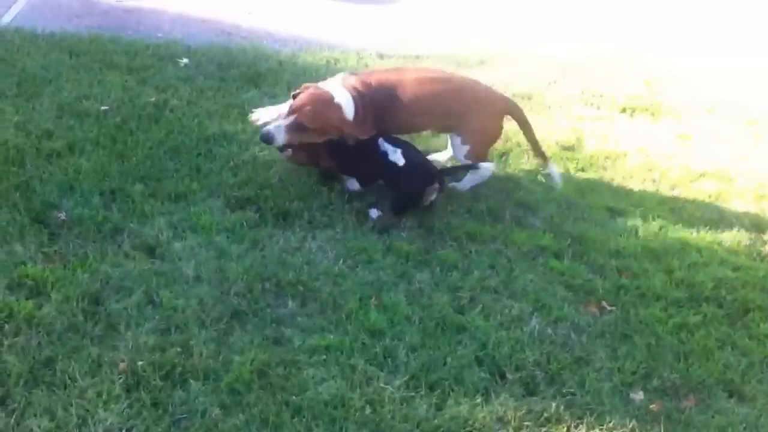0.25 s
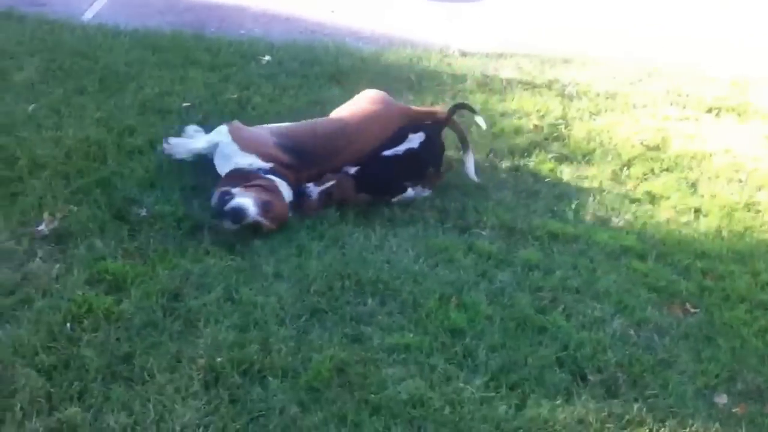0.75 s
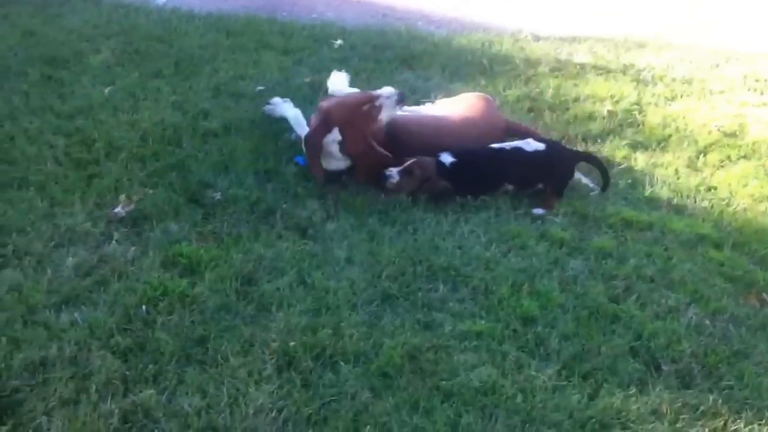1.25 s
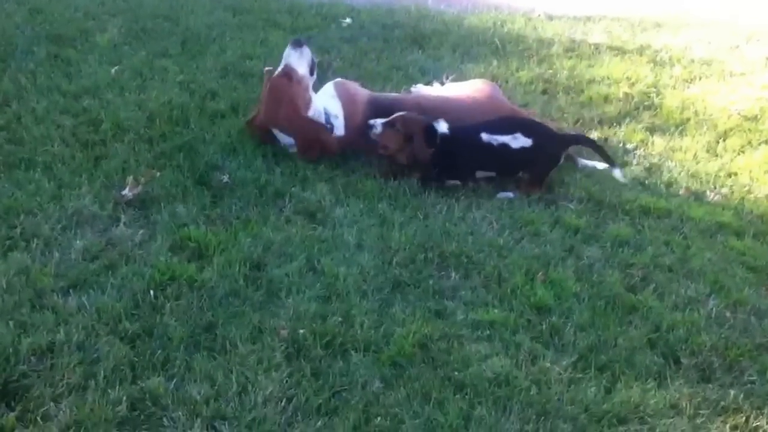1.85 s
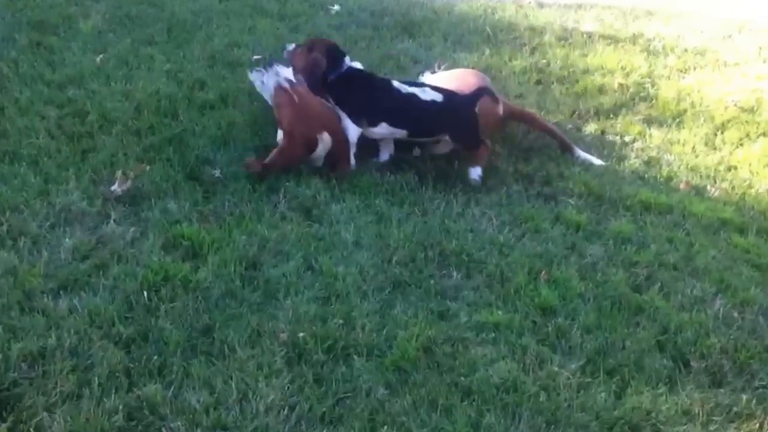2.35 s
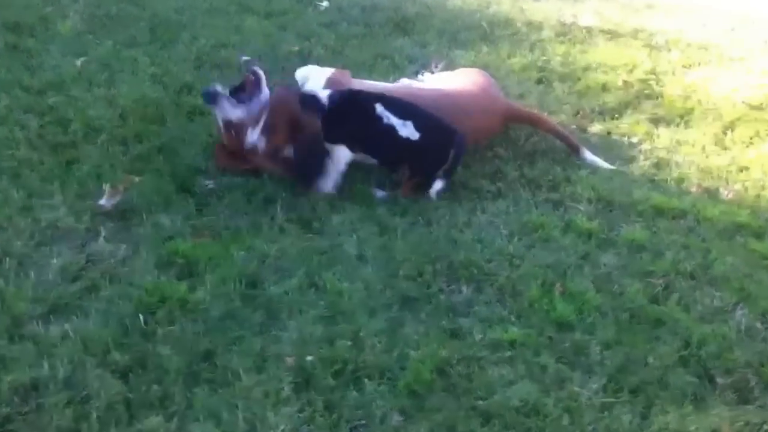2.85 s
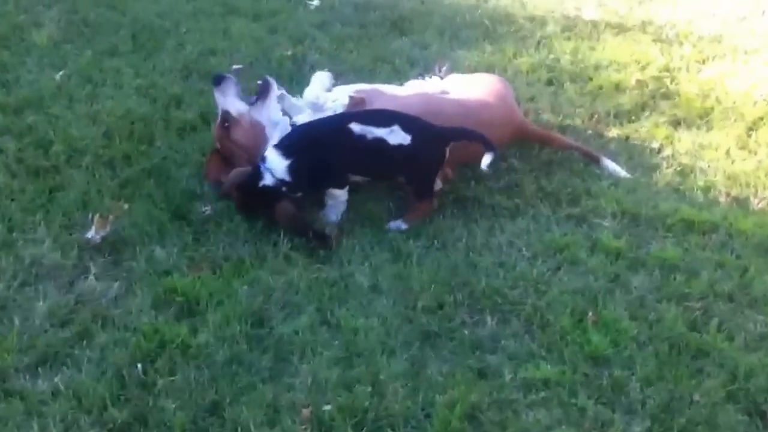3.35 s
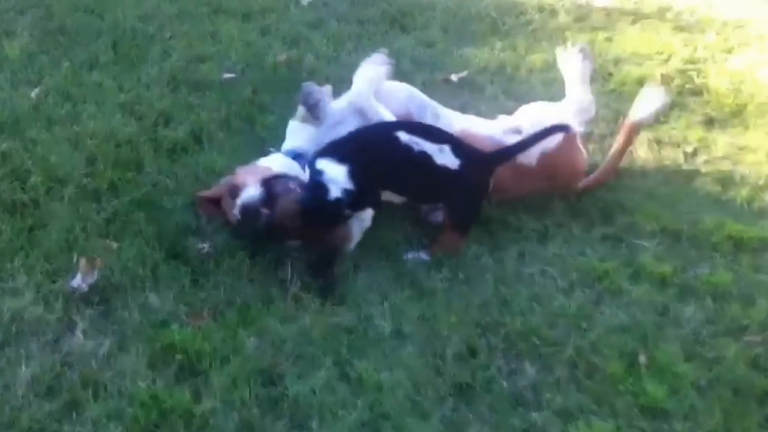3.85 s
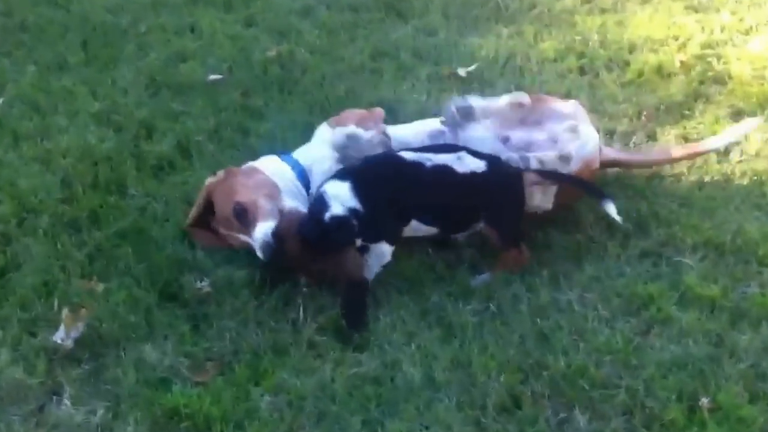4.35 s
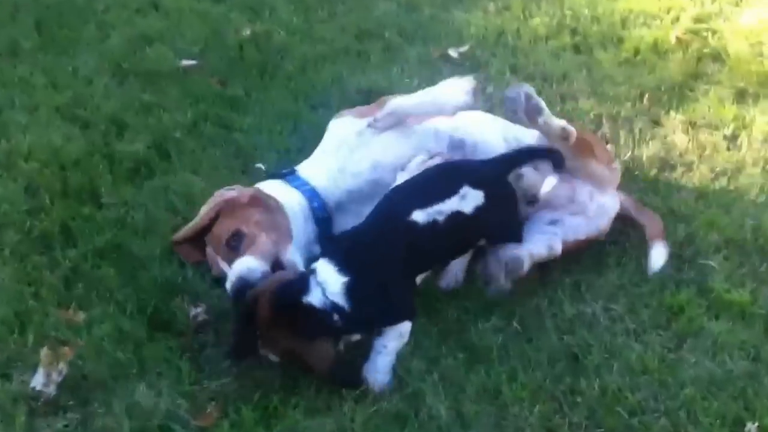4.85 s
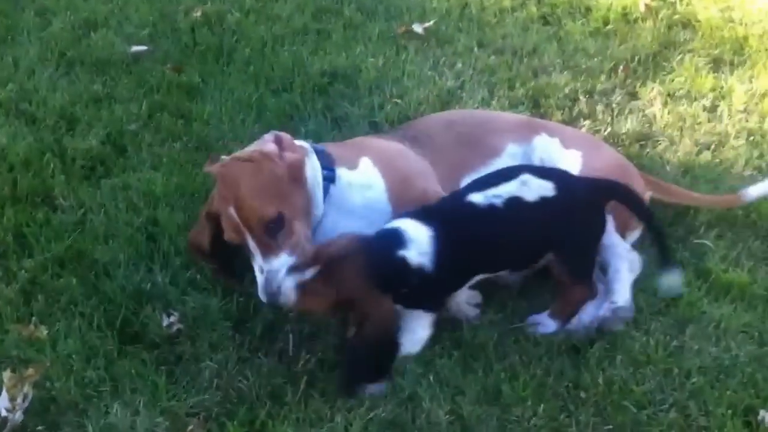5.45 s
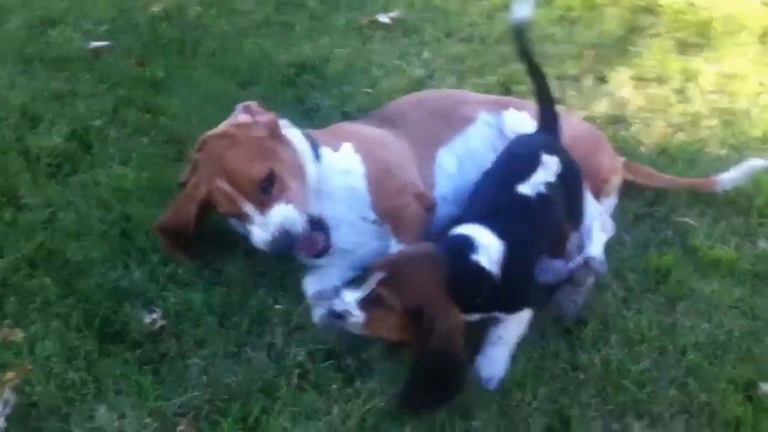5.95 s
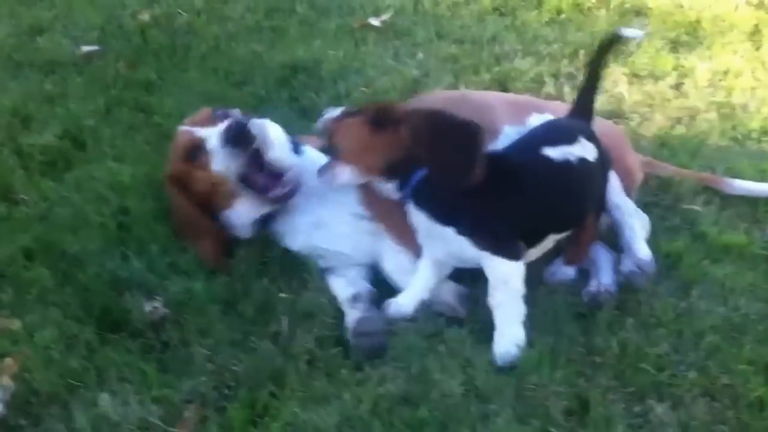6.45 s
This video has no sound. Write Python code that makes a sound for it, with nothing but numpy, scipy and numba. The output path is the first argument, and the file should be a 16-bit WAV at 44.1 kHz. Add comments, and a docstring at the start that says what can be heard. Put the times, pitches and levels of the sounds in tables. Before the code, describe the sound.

Short raspy puppy growls and little yaps over rustling grass, soft panting and a quiet garden hiss as two dogs play.

```python
"""A puppy's short growls come first, with hard vocal pops and short yaps: it is wrestling with a
grown dog on a lawn. Slow, uneven beats of its vocal folds make its throat, its pharynx (the space
behind the tongue) and its half-open mouth ring. The bodies rustle the grass and bump the ground,
the dogs pant and huff, stems crack, a collar tag clinks, and a quiet garden hisses behind it all."""
import sys
import numpy as np
from scipy import signal
from scipy.fft import rfft, irfft
from scipy.io import wavfile
from scipy.ndimage import uniform_filter1d
from numba import njit

SR = 44100
rng = np.random.default_rng(int(sys.argv[2]) if len(sys.argv) > 2 else 0)


def store_wav(level_fs):
    """Save 16-bit WAV to argv[1]."""
    pcm = np.round(np.clip(np.atleast_2d(level_fs), -1, 1) * 32767)
    wavfile.write(sys.argv[1], SR, pcm.T.astype(np.int16))


N = 295029
TIME = np.arange(N) / SR

# the tone of the garden air: f/Hz, relative level/dB
GARDEN_SPECTRUM = [(30, -25), (70, -9.5), (140, 1.5), (290, -2.5), (440, -10.5), (700, -4.5), (1300, -18),
                   (3500, -25.5), (5400, -15), (7300, -25.5), (9600, -11), (12000, -44)]
# the tone of rustling grass: f/Hz, relative level/dB
GRASS_SPECTRUM = [(50, -16), (300, -9), (1200, -5), (2000, -3.5), (3000, -12), (4000, -11.5), (5400, -9.5),
                  (7400, -12.5), (9500, -6), (12000, -9.5), (15500, -10.5)]
# steady stirring of the grass, louder as the dogs come near: t/s, level/dB
RUSTLE_LEVELS = [(0, -55), (1.8, -61.5), (3.5, -61.5), (6.69, -54)]
# a body rolls or a paw sweeps through the grass: middle t/s, length/s, level/dB
GRASS_SWISHES = [(.29, 0.053, -51.5), (2.58, 0.15, -56), (2.96, 0.21, -53.5), (3.95, 0.28, -51.5),
                 (4.53, 0.031, -53.5), (4.7, 0.3, -52.5), (5.15, 0.054, -52), (5.29, .11, -50.5),
                 (5.6, 0.21, -52.5), (5.85, 0.097, -49.5), (6.24, 0.15, -51), (6.43, 0.095, -51.5),
                 (6.62, 0.088, -53)]
# paws and flanks meet the turf: t/s, peak level/dB, ring time/s
TURF_BUMPS = [(2.423, -42, 0.039), (3.237, -41, 0.037), (3.262, -42, 0.087), (3.816, -42.5, 0.11),
              (3.86, -38, 0.061), (4.392, -44, 0.02)]
# stems crack and teeth tick: t/s, peak level/dB, centre f/Hz
SHARP_TICKS = [(0.0672, -26, 10300), (0.876, -34, 9010), (2.998, -22, 11900), (3.036, -29.5, 9800),
               (3.5578, -30.5, 11500), (3.61, -34, 11000), (3.676, -36, 10500), (3.7684, -25, 12200),
               (5.922, -30.5, 9800), (6.586, -31.5, 5900)]
# the tones of the metal collar tag: f/Hz, relative level/dB, ring time/s
TAG_TONES = [(8960, -11.5, 0.1), (10190, 6.5, 0.098), (12000, -19, 0.079), (14900, -24, 0.18)]
# the tag strikes its ring: t/s, peak level/dB
TAG_CLINKS = [(0.316, -43), (1.8038, -24)]
# soft pants through the open mouth: middle t/s, length/s, level/dB
MOUTH_PANTS = [(.54, 0.08, -61.5), (1.2, 0.091, -63.5), (2.87, 0.04, -59), (3.965, 0.083, -53.5),
               (5.26, 0.15, -55.5), (6.23, 0.23, -58.5)]
# a huff through the nose: middle t/s, length/s, level/dB
NOSE_HUFFS = [(5.67, 0.067, -47)]
# air hisses between the teeth: middle t/s, length/s, level/dB
TEETH_HISSES = [(2.02, 0.052, -64), (2.24, 0.049, -60.5)]
# hard vocal pops and short yaps from the open mouth: t/s, peak level/dB, f/Hz, ring time/s
POPS_AND_YAPS = [(.006, -30.5, 1120, 0.037), (0.092, -36, 1590, 0.024), (.9245, -28.5, 1270, 0.0053),
                 (3.002, -35.5, 1205, 0.031), (4.108, -30, 1220, 0.0075), (6.524, -36.5, 904, 0.077),
                 (6.586, -30, 975, 0.034), (6.5965, -36, 1160, 0.018), (6.6228, -28.5, 1150, 0.023),
                 (6.629, -34.5, 1240, 0.032), (6.687, -38.5, 1070, 0.035)]
# the throat's resonance sinks as the play goes on: t/s, f/Hz
THROAT_RESONANCE = [(0, 252), (.9, 218), (2, 172)]
# the growls: start t/s, time to peak/s, length/s, fold beat at peak f/Hz, throat level at peak/dB,
# pharynx over throat/dB, mouth over throat/dB, snarl over throat/dB, pharynx f/Hz,
# mouth start f/Hz, mouth end f/Hz, mouth bandwidth/Hz, rasp (breath noise over pulses, a ratio)
PUPPY_GROWLS = [ (-.012, 0.011, 0.048, 91.1, -47.5, -14, -1.5, -19, 560, 1090, 1050, 160, 0.3),
                (0.059, 0.024, 0.062, 87.4, -48, -3, -4.5, -20, 514, 1440, 1560, 300, 1.28),
                (0.124, 0.022, 0.24, 77.46, -49.5, -2, -1.5, -10.5, 590, 1490, 1340, 560, 0.9),
                (0.28, 0.08, 0.13, 80.1, -50, -6.5, 2.5, -31, 617, 875, 685, 225, 0.42),
                (0.659, 0.085, 0.24, 89.9, -49, 6.5, 5, -9.5, 696, 1110, 1060, 750, 0.46),
                (0.868, 0.032, 0.14, 84.5, -48.5, -2, -3, -7.5, 604, 1170, 950, 603, 0.95),
                (1.395, 0.079, 0.17, 71.9, -52.5, -1, -1, -11.5, 623, 930, 810, 370, 0.83),
                (1.9635, 0.046, 0.078, 82.1, -52, 0.5, 1.5, -12.5, 640, 940, 980, 376, 0.57),
                (2.038, 0.027, 0.16, 67.7, -54.5, -4.5, -3.5, -25, 593, 1040, 1190, 296, 0.53),
                (2.195, 0.081, 0.093, 67.3, -56.5, -2.5, 1, -4.5, 726, 1340, 1360, 350, 0.95),
                (2.298, 0.096, 0.16, 73.94, -53, 5, -7, -6, 726, 940, 980, 500, 0.8),
                (2.418, 0.062, 0.074, 84.2, -51.5, 5, 5.5, -5.5, 730, 1070, 1280, 375, 0.82),
                (2.912, 0.084, 0.12, 79.1, -51.5, -5.5, -2, -19, 640, 1140, 1200, 250, 1.16),
                (3.025, 0.12, 0.17, 76.8, -49.5, -7, -4.5, -22, 440, 1030, 1120, 360, 0.58),
                (3.206, 0.14, 0.16, 81.9, -47, -8.5, -16.5, -18.5, 376, 1160, 920, 302, 1.15),
                (3.358, 0.032, 0.17, 81.6, -48.5, -3, 4, -6.5, 740, 1200, 1220, 324, 0.72),
                (4.511, 0.098, 0.14, 76.9, -50, -17.5, -15, -10, 410, 1200, 1200, 300, 0.65),
                (4.619, 0.12, 0.18, 81.2, -46, -5.5, -1, -4, 575, 1140, 1170, 270, 0.77),
                (4.792, 0.08, 0.087, 82.1, -44.5, -4, 2.5, -15, 686, 1280, 1090, 327, 0.56),
                (4.8778, 0.021, 0.103, 82.6, -44, -1.5, 3, -25, 747, 890, 1060, 330, 0.72),
                (4.922, .07, 0.11, 85.1, -64, 2, 15, -12, 950, 1600, 1410, 600, 1.7),
                (5.443, 0.028, 0.12, 85.6, -43.5, -6, -5.5, -15, 438, 960, 1390, 180, 0.86),
                (6.458, 0.18, 0.36, 78.46, -48.5, 1, -3.5, -11, 405, 800, 1230, 300, 0.9), ]


def undb(db):
    """Turn decibels into a gain to multiply by."""
    return 10 ** (np.asarray(db) / 20)


def unit(x):
    """Scale a signal so its average strength (rms) is 1."""
    return x / np.sqrt(np.mean(x ** 2))


def even(x, size=1000):
    """Hold the strength at 1 over a few pulses, leaving each pulse its shape."""
    return x / np.sqrt(uniform_filter1d(uniform_filter1d(x ** 2, size), size) + 1e-12)


def noise(size=N):
    """White noise: a plain hiss."""
    return rng.standard_normal(size)


def wander(rate_hz, size=N):
    """A smooth random wobble of strength 1 that heads for a new value rate_hz times a second."""
    hold = int(SR / rate_hz)
    steps = noise(size)[np.arange(size) // hold]
    return unit(uniform_filter1d(uniform_filter1d(steps, hold), hold))


@njit
def band_pass(x, tuning, damping):
    """A state-variable filter: it keeps one band of frequencies, with gain 1 at the centre."""
    out, band_state, low_state = np.empty(len(x)), 0., 0.
    for i in range(len(x)):
        band = (band_state + tuning[i] * (x[i] - low_state)) / (1 + tuning[i] * (tuning[i] + damping[i]))
        band_state = 2 * band - band_state
        low_state += 2 * tuning[i] * band
        out[i] = damping[i] * band
    return out


def resonate(x, hz, width_hz):
    """A resonance: like a hollow space, it favours sound near hz, which may move."""
    hz = np.minimum(hz, .45 * SR) * np.ones(len(x))
    return band_pass(x + 1e-18, np.tan(np.pi * hz / SR), width_hz / hz)


def resonate_twice(x, hz, width_hz):
    """The same resonance twice over, for steeper sides."""
    return resonate(resonate(x, hz, width_hz), hz, width_hz)


def cut(x, hz, kind, order=2):
    """Keep the "low" or the "high" side of hz."""
    return signal.sosfilt(signal.butter(order, hz, kind, fs=SR, output="sos"), x + 1e-18)


def trim(x, hz, kind, order=2):
    """Like cut, but run forwards and backwards, so pulses are not delayed."""
    return signal.sosfiltfilt(signal.butter(order, hz, kind, fs=SR, output="sos"), x + 1e-18)


def colour(x, spectrum):
    """Shape a sound's tone with a spectrum table, at strength 1."""
    hz, db = np.transpose(spectrum)
    bins = np.maximum(np.fft.rfftfreq(N, 1 / SR), 1)
    gain = undb(np.interp(np.log(bins), np.log(hz), db))
    return unit(irfft(rfft(x) * gain, N))


def fade(ring_s):
    """A short time axis and a fade that falls 60 dB in the ring time."""
    t = TIME[:SR // 4]
    return t, np.exp(-np.log(1000) * t / ring_s)


def swells(rows):
    """A gain that rises and falls in one bell shape for each row."""
    power = 0
    for middle, length, db in rows:
        distance = 2 * (TIME - middle) / length
        power += undb(db) ** 2 * .5 ** np.minimum(distance ** 2, 20)
    return np.sqrt(power)


def add(out, start, db, sound):
    """Mix in a short sound at start seconds with its peak at db."""
    i = max(int(start * SR), 0)
    out[i:i + len(sound)] += (undb(db) * sound / np.abs(sound).max())[:N - i]


def garden(level_db=-61.5):
    """Outdoor air makes a steady, quiet hiss."""
    return colour(noise(), GARDEN_SPECTRUM) * undb(level_db)


def grass(grain_db=1.4, flicker_db=1.86, crush_db=2.5):
    """Countless blades flick past fur; the lower sound of crushed stems comes and goes on its own."""
    grains = noise() * undb(grain_db * np.minimum(rng.exponential(size=N), 5))
    grains *= rng.random(N) < .25  # gaps make the hiss grainy
    rustle = colour(grains, GRASS_SPECTRUM)
    stems = trim(rustle, 5800, "low")
    blades = (rustle - stems) * undb(flicker_db * wander(45))
    crush = stems * undb(crush_db * wander(20))
    stirring = undb(np.interp(TIME, *np.transpose(RUSTLE_LEVELS)))
    return (blades + crush) * np.hypot(stirring, swells(GRASS_SWISHES))


def bumps(hz=132, attack_s=0.0039):
    """Soft weight lands on soft turf: a few low waves swell and die."""
    out = np.zeros(N)
    for start, db, ring_s in TURF_BUMPS:
        t, decay = fade(ring_s)
        thud = np.sin(2 * np.pi * hz * t) * decay * (1 - np.exp(-t / attack_s)) ** 2
        add(out, start, db, cut(thud, 71, "high"))
    return out


def ticks(ring_s=0.0036, knock_gain=0.33, knock_hz=2600):
    """Stems and teeth make tiny bright cracks, each with a faint lower knock."""
    out = np.zeros(N)
    t, decay = fade(ring_s)
    for start, db, hz in SHARP_TICKS:
        burst = noise(len(t)) * decay
        crack = resonate(resonate(burst, hz, .8 * hz), hz, hz)
        knock = resonate(burst, knock_hz, knock_hz / 2)
        add(out, start, db, crack + knock_gain * knock)
    return out


def collar_tag(click_gain=0.098):
    """The small metal tag rings briefly after a sharp hit."""
    out = np.zeros(N)
    t, contact = fade(0.012)
    ring = sum(undb(db) * np.sin(2 * np.pi * hz * t) * fade(ring_s)[1] for hz, db, ring_s in TAG_TONES)
    for start, db in TAG_CLINKS:
        click = cut(noise(len(t)) * contact, 4500, "high")
        add(out, start, db, ring + click_gain * click)
    return out


def pants(mouth_hz=1250, hiss_hz=1980, width_hz=650):
    """A dog pants between growls: rushing air stirs two resonances of its open mouth."""
    low, high = (unit(resonate_twice(noise(), hz, width_hz)) for hz in (mouth_hz, hiss_hz))
    return unit(undb(-2.5) * low + high) * swells(MOUTH_PANTS)


def huff(nose_hz=610, hiss_hz=2080, width_hz=330):
    """A dog blows through its nose: rushing air stirs two resonances."""
    low, high = (unit(resonate_twice(noise(), hz, width_hz)) for hz in (nose_hz, hiss_hz))
    return even(low + undb(-9.5) * high) * swells(NOSE_HUFFS)


def teeth_hiss(hz=5200, width_hz=1400):
    """Air squeezed between the teeth makes a thin hiss."""
    return unit(resonate_twice(noise(), hz, width_hz)) * swells(TEETH_HISSES)


def pops_and_yaps(splash_gain=0.8, edge_gain=1.07, edge_hz=2250, attack_s=.0008):
    """A sudden pulse of the vocal folds rings the open mouth, with a wet splash and a bright edge."""
    out = np.zeros(N)
    for start, db, hz, ring_s in POPS_AND_YAPS:
        t, decay = fade(ring_s)
        shape = decay * (1 - np.exp(-t / attack_s))
        air = noise(len(t)) * shape
        tone = np.sin(2 * np.pi * hz * t) * shape
        splash = splash_gain * resonate(air, hz, 2 * hz)
        edge = edge_gain * resonate(air, edge_hz, hz / 2)
        pop = cut(tone + splash + edge, 0.21 * hz, "high")
        add(out, start, db, cut(pop, 2300, "low", order=6))
    return out


def effort(t, rise, length, attack_s=0.018, release_s=0.015, swell_db_per_s=31.5, sag_db_per_s=41.5):
    """A growl starts fast, builds, sags and stops: its on-off gain, and its push in dB (peak 0)."""
    gate = np.minimum(t / attack_s, 1) * np.exp(-np.maximum(t - length, 0) / release_s)
    push_db = -np.maximum(swell_db_per_s * (rise - t), sag_db_per_s * (t - rise))
    return gate, push_db


def vocal_folds(hz, rasp, jitter=.07, shimmer_db=6, flap_scatter=0.11, flap_db=-10):
    """The folds clap shut, less evenly when breathy; loose tissue flaps twice after each beat."""
    cycles = np.cumsum(hz) / SR
    stretch, force, *flaps = rng.standard_normal(size=(60, 6)).T
    uneven = 0.32 + 0.68 * rasp
    beats = np.cumsum(np.maximum(1 + jitter * uneven * stretch, .5))
    pulses = np.zeros(len(hz) + 1)
    pulses[np.searchsorted(cycles, beats)] += undb(shimmer_db * uneven * np.tanh(force))
    for delay, shift, size in zip((.4, .62), flaps[::2], flaps[1::2]):
        flap_at = np.searchsorted(cycles, beats + delay + flap_scatter * shift)
        pulses[flap_at] += undb(flap_db + shimmer_db * np.tanh(size))
    phase = np.interp(cycles, np.r_[-1, beats], np.arange(len(beats) + 1)) % 1  # 0 to 1 between beats
    return unit(pulses[:-1]), phase


def growl(t, rise, length, beat_hz, throat_hz, throat_db, pharynx_db, mouth_db, snarl_db,
          pharynx_hz, from_hz, to_hz, mouth_width_hz, rasp, beat_hz_per_db=1.1, jaw_follow=2.23):
    """Fold pulses and puffs of breath ring the throat, the pharynx, the mouth and a higher snarl."""
    size = len(t)
    gate, push_db = effort(t, rise, length)
    # the folds slow down as effort falls
    pulses, phase = vocal_folds(beat_hz + beat_hz_per_db * push_db, rasp)
    breath = unit(np.exp(-phase / .35) * noise(size))
    source = pulses + rasp * breath
    waver = 1 + 0.055 * wander(21.3, size)
    # the throat hums even with the jaws shut
    throat = resonate(pulses + .5 * rasp * breath, throat_hz * waver, width_hz=106)
    throat = cut(cut(throat, 147, "high", order=4), 370, "low", order=4)
    # the pharynx wavers with the root of the tongue
    hz = pharynx_hz * waver
    pharynx = resonate(resonate(source, hz, 0.41 * hz), hz, 0.42 * hz)
    # the mouth resonance glides with the jaws while tongue and lips tremble
    hz = np.interp(t, [0, length], [from_hz, to_hz]) * (1 + 0.055 * wander(60, size))
    mouth = resonate(resonate(source, hz, mouth_width_hz), hz, 0.92 * mouth_width_hz)
    # above the mouth resonance the voice falls away steeply
    edge_hz = max(from_hz, to_hz) + 1.8 * mouth_width_hz
    pharynx, mouth = (trim(x, edge_hz, "low", order=4) for x in (pharynx, mouth))
    # each beat spatters saliva, so the snarl is a ragged burst that never repeats
    spatter = unit(np.exp(-phase / .12) * noise(size)) + rasp * breath
    snarl = resonate(resonate(spatter, 2080, 1350), 3000, 1340)
    snarl = cut(snarl, 2060, "low", order=6)
    # the jaws open with effort, so mouth and snarl swell more than the rest
    push, jaws = undb(push_db), undb(jaw_follow * push_db)
    upper = push * undb(pharynx_db) * even(pharynx)
    upper += jaws * (undb(snarl_db) * even(snarl) - undb(mouth_db) * even(mouth))
    upper = trim(upper, 0.71 * pharynx_hz, "high")  # leaves a quiet gap just above the throat's hum
    return gate * undb(throat_db) * (push * even(throat) + upper)


def puppy():
    """The puppy growls in short bursts, each placed at its start time."""
    out = np.zeros(N)
    t = TIME[:SR // 2]
    for start, rise, length, beat_hz, *voice in PUPPY_GROWLS:
        throat_hz = np.interp(start, *np.transpose(THROAT_RESONANCE))
        sound = growl(t, rise, length, beat_hz, throat_hz, *voice)
        out += np.interp(TIME - start, t, sound, left=0, right=0)
    return out


def scene():
    """The dogs and their surroundings mix in the open air, the same in both ears."""
    dogs = puppy() + teeth_hiss() + pops_and_yaps() + huff() + pants()
    mono = dogs + grass() + bumps() + ticks() + collar_tag() + garden()
    return np.array([mono, mono])


def record(dry, top_hz=15900):
    """Cut away the very highest treble."""
    return signal.sosfilt(signal.ellip(10, .2, 70, top_hz, fs=SR, output="sos"), dry)


dry = scene()
out = record(dry)
store_wav(out)
```